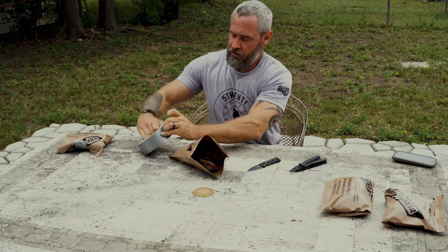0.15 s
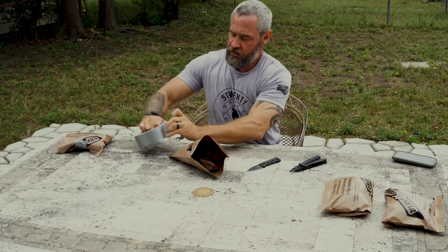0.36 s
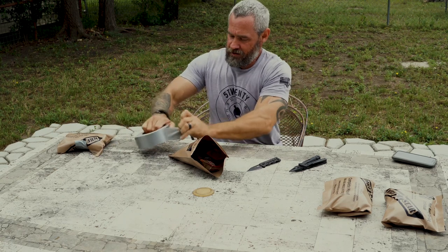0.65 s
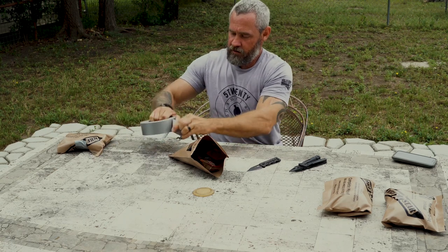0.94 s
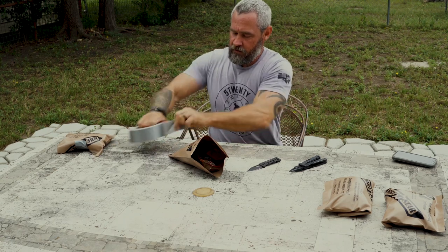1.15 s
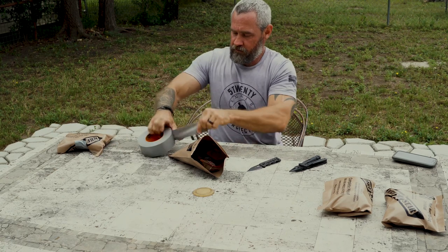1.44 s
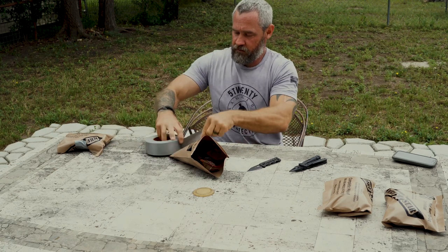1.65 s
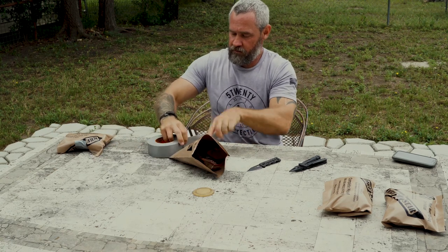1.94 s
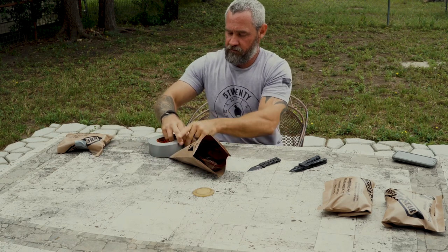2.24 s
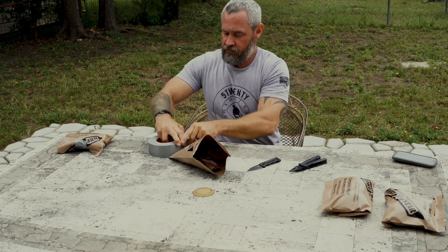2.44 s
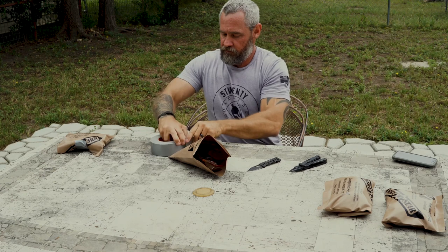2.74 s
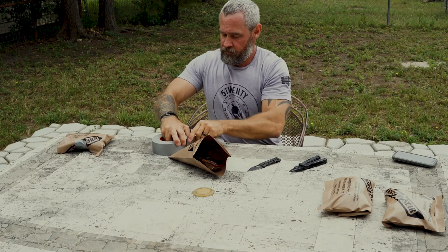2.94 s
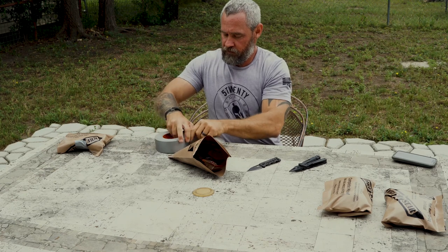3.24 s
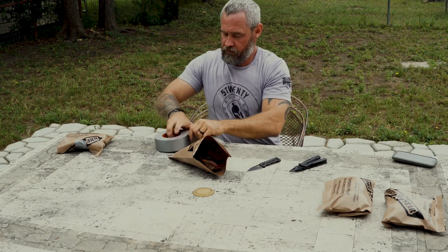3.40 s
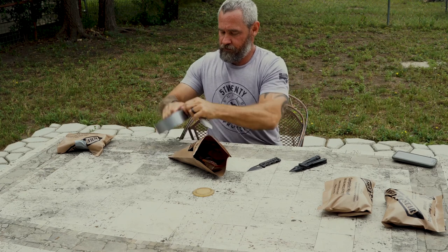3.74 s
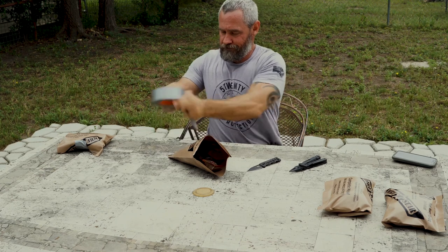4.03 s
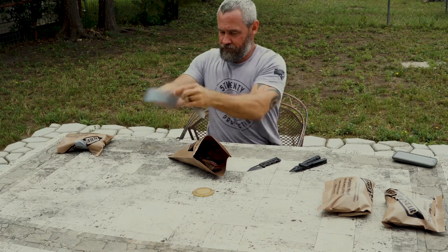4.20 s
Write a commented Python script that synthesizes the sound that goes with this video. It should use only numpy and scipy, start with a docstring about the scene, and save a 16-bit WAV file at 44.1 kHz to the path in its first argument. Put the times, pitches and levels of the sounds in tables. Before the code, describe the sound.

In a quiet garden, brief crackling tape pulls and hollow roll thumps come in clusters, with soft finger rubbing, distant birds and insects.

```python
"""A bird's quick falling phrase opens, then more birds and insects far off; cloth tape is pulled in short jerks.
Tape: glue lets go in stick-slip bursts of snaps that ring the strip's resonances. Roll: hollow knocks, decaying
modes struck on a stone garden table. Fingers: dense grains press and rub. Birds: gliding, warbled sines and a
hazy noise band. Insects: throbbing hiss and gated chirps. Beneath: coloured-noise air, pressure lumps, a fading
low tone; diffuse garden echoes."""
import sys
import numpy as np
from scipy import signal
from scipy.io import wavfile
from scipy.ndimage import uniform_filter1d

SR = 44100
rng = np.random.default_rng(int(sys.argv[2]) if len(sys.argv) > 2 else 0)


def volts_from_decibels(level):
    """Turn decibel levels (scalar or array-like) into linear amplitude factors."""
    exponent = np.asarray(level, float) / 20
    return 10 ** exponent


def log_audio(samples):
    """Write samples as a 16-bit WAV file to the path given in sys.argv[1]."""
    # one column per channel
    frames = np.atleast_2d(samples).T
    # limit to full scale, then quantise
    limited = np.clip(frames, -1, 1)
    pcm = np.round(limited * 32767).astype(np.int16)
    wavfile.write(sys.argv[1], SR, pcm)


N = 192349

# Levels are relative: layer gains, filters and drifts act on them.
# air noise spectrum: f/Hz, density/dB
AIR_SPECTRUM = [(15, -30), (25, 9.5), (86, -4), (367, -8), (615, -19.5), (1600, -19), (2300, -38),
                (2750, -19.5), (5250, -42.5), (6290, -41), (7350, -17.5), (8360, -34), (12000, -44.5),
                (15600, -72.5), (22000, -120)]
# left-right likeness of the air: f/Hz, likeness/0-1
AIR_LIKENESS = [(30, 0.081), (70, 0.52), (300, .9), (2000, 0.99), (8000, 0.24)]
# weak pressure lumps on the microphone: t/s, level/dB
WEAK_LUMPS = [(.029, -65), (1.33, -56)]
# faint low tone that fades out: f/Hz, level/dB, end/s
FAINT_TONE = (486, -77.5, 0.83)
# insect chorus level: t/s, level/dB
INSECT_LEVEL = [(0, -74), (.12, -86), (.35, -83.5), (.75, -74.5), (.89, -80), (1.1, -82), (1.6, -72),
                (1.81, -73.5), (2.54, -83.5), (2.93, -79.5), (3.36, -84.5), (3.61, -79), (4.37, -85.5)]
# plain bird whistles: t/s, length/s, first f/Hz, last f/Hz, level/dB
BIRD_WHISTLES = [(0.526, 0.093, 6260, 5500, -71), (1.182, 0.1, 7400, 5550, -74.5),
                 (1.224, 0.13, 2370, 2333, -64.5), (1.277, 0.028, 2250, 1730, -64),
                 (1.327, 0.012, 6234, 2658, -52.5), (1.411, .073, 1834, 1796, -67),
                 (1.723, 0.0073, 6860, 6220, -52.5), (1.877, 0.026, 6200, 5600, -68.5),
                 (1.937, 0.04, 4080, 4440, -73.5), (1.99, 0.046, 4180, 4430, -71.5),
                 (2.497, 0.039, 3424, 4540, -71.5), (3.024, 0.016, 5740, 5870, -70),
                 (3.038, 0.045, 6100, 5300, -66.5), (3.246, 0.11, 6950, 5630, -82),
                 (3.801, 0.043, 3460, 3290, -79), (3.833, 0.4, 2072, 2026, -79),
                 (4.03, 0.16, 5680, 4900, -71), (4.152, 0.09, 6600, 4950, -78.5),
                 (4.291, 0.045, 5870, 4900, -68.5), (4.047, .18, 2966, 2840, -79.5)]
# warbled notes on a held pitch: t/s, length/s, f/Hz, level/dB, warble depth/Hz
BIRD_WARBLES = [(0.164, 0.033, 3730, -60.5, 142), (0.208, 0.028, 3300, -65, 250),
                (0.23, 0.022, 3420, -86.5, 90), (0.897, 0.058, 1816, -68, 100.3),
                (0.934, 0.15, 2304, -69.5, 126), (1.123, 0.21, 2586, -76.5, 102),
                (2.46, 0.08, 4650, -81, 119.4), (2.507, 0.083, 3830, -73.5, 300),
                (2.553, 0.045, 3930, -66.5, 101), (2.756, 0.084, 2100, -66, 99),
                (3.203, 0.22, 2656, -71.5, 151.6), (3.755, 0.27, 2830, -82.5, 77.9),
                (3.943, 0.079, 3410, -71.5, 150.3), (3.983, 0.053, 3100, -70, 149)]
# phrases of a nearer bird, one list each: t/s, f/Hz, level/dB
BIRD_PHRASES = [
    [(.157, 2200, -70), (.16, 2550, -60), (.1645, 1900, -71), (.169, 2450, -54), (.174, 1900, -66),
     (.182, 2750, -48), (.189, 2100, -86), (.198, 3050, -48.5), (.204, 2000, -54), (.209, 2750, -63),
     (.214, 2000, -65)],
    [(.982, 1940, -70), (1.0, 1950, -64), (1.022, 1960, -63.5), (1.045, 1640, -68)],
    [(1.075, 1580, -72), (1.095, 1760, -64), (1.135, 1870, -64.5), (1.185, 1740, -68.5)],
    [(2.31, 6850, -73), (2.345, 6480, -79), (2.398, 6420, -82), (2.42, 6000, -77.5)],
    [(0, 5830, -47.5), (.012, 4630, -60.5), (.025, 3370, -60.5)],
    [(.079, 5220, -63), (.092, 4170, -55), (.102, 4000, -57), (.125, 3840, -68)],
    [(1.344, 4780, -58), (1.354, 3450, -55), (1.364, 3810, -55), (1.368, 3534, -63), (1.374, 3810, -51),
     (1.379, 2838, -61)],
    [(1.386, 2750, -61.5), (1.392, 3810, -54), (1.398, 2850, -61), (1.405, 3582, -57.5), (1.41, 3040, -56),
     (1.42, 3650, -53.5), (1.424, 3667, -54), (1.434, 3752, -52.5), (1.445, 3357, -49.5), (1.45, 2700, -66)],
    [(1.652, 8540, -67), (1.664, 8100, -54), (1.68, 7000, -53), (1.705, 4400, -62), (1.722, 3400, -52),
     (1.733, 3040, -58)],
]
# repeated call that drops fast onto a held pitch: t/s, held f/Hz, level/dB
BIRD_CHEEPS = [(2.101, 5270, -66.5), (2.191, 5370, -67), (2.292, 5290, -70.5), (2.396, 5240, -71.5),
               (2.5, 5180, -73.5)]
# far overlapping song: start/s, end/s, low f/Hz, high f/Hz, level/dB
FAR_BIRDS = (1.2, 2, 1605, 2603, -69.5)
# skin-on-cloth spectrum: f/Hz, density/dB
RUB_SPECTRUM = [(120, -30), (200, -2), (330, -3.5), (560, -16.5), (850, -9.5), (1300, -4.5), (1900, -12.5),
                (2700, -6), (3600, -6), (5300, -14), (6400, -29.5), (8000, -31.5), (14000, -36.5)]
# finger strokes on tape and pouch: peak t/s, rise/s, fall/s, peak level/dB, treble/dB
FINGER_STROKES = [(0.079, 0.053, 0.094, -67.5, 18), (1.25, 0.047, 0.061, -80, 23),
                  (1.351, 0.027, .07, -60.5, 8), (1.496, 0.048, .005, -58.5, 16),
                  (2.28, 0.1, 0.13, -70, 14.5), (2.65, 0.081, 0.13, -56.5, 10),
                  (2.852, 0.046, 0.096, -56, 16), (2.961, 0.074, 0.1, -52, -16.5),
                  (3.171, 0.059, 0.091, -55, -13.5), (3.3, 0.024, 0.063, -72.5, 21),
                  (3.371, 0.043, 0.04, -62.5, -10), (3.598, 0.12, 0.048, -55.5, 0),
                  (3.7, 0.077, 0.28, -76.5, 20.5), (3.86, 0.036, 0.16, -78.5, 21.5)]
# modes of the hollow roll on the slab: nominal f/Hz, level/dB, undamped t60/s
ROLL_MODES = [(110, -22.5, 0.14), (187.5, -7, 0.25), (222, 0, 0.19), (281.9, -1.5, 0.3), (335, 1.5, 0.14),
              (381, -1.5, 0.18), (465, -5.5, 0.24), (506, -6, 0.3), (672, -11.5, 0.069), (830, -6, 0.15),
              (900, -3, 0.025), (970, -3.5, 0.25), (1170, 8.5, 0.039), (1340, 11, 0.017),
              (1723, -6.5, 0.28), (2180, -7, 0.044), (3100, -5, 0.084)]
# blows and tugs on the roll: t/s, level/dB, hardness/Hz, freedom from the hand's damping/0-1
ROLL_KNOCKS = [(.743, -44.5, 704, 1), (0.775, -27.5, 700, 0.3), (0.793, -31.5, 690, 0.4),
               (1.4979, -27, 503, 0.86), (1.519, -28.5, 610, 0.9), (1.548, -37.5, 700, 0.87),
               (1.58, -27, 615, 0.2), (1.761, -33, 883, 0.27), (1.766, -44, 883, 0.3),
               (1.773, -51, 883, 0.4), (1.8052, -16.5, 400, 0.66), (1.844, -20.5, 323, 0.55),
               (1.867, -32, 300, 0.58), (1.9, -35.5, 300, 0.77), (2.064, -38.5, 855, 0.92),
               (2.091, -19.5, 2900, 0.58), (2.131, -25, 600, 0.49), (2.66, -53.5, 495, 0.53),
               (2.8692, -36, 2970, 0.39), (2.888, -43, 1979, 0.75), (2.979, -46.5, 447, 1),
               (3.008, -50.5, 397, 0.72), (3.612, -48.5, 503, 0.76)]
# resonances of free strip and table reflection: f/Hz, width/Hz, level/dB
STRIP_MODES = [(318, 41, -24), (838, 150, -14.5), (1100, 320, -4.5), (1487, 280, 0), (2100, 510, -2.5),
               (2700, 430, 0.5), (4000, 590, -4.5), (4900, 1100, -5), (8570, 1200, -12),
               (9550, 2000, -13.5), (12750, 1100, -19.5), (14500, 700, -17.5)]
# stick-slip bursts of the glue: t/s, length/s, level/dB, tautness/dB, crispness/dB
GLUE_SLIPS = [(.063, .002, -64, 0, 9), (.0738, .003, -43, -1, 9), (.6087, .002, -33.5, -.5, -.5),
              (.6245, .007, -31, 3, 5), (.641, .006, -28, 3, 2), (.647, .005, -21, 0, -4),
              (.6585, .0017, -28, -1, -8), (.7425, .007, -21.5, -6, 5), (.7535, .016, -23.5, -5, 6),
              (.774, .008, -22, -3, 5.5), (.791, .007, -19.5, -5, 6), (1.351, .003, -41.5, -3, -1),
              (1.4625, .004, -43, 3, 6.5), (1.4985, .0028, -26, -2, 6), (1.503, .004, -26, -2, 6),
              (1.5085, .0355, -26.5, -1, 7), (1.544, .02, -23.5, -.5, 8), (1.564, .0048, -20, 1.5, 3),
              (1.572, .0045, -21.5, 3, -2), (1.5795, .0028, -22, 0, -.5), (2.028, .003, -55, 3, 0),
              (2.0315, .002, -43, 3, 4.5), (2.034, .01, -50, 3, 2), (2.0445, .0025, -35, 4, 5),
              (2.063, .011, -43, -2, 0), (2.08, .003, -52, 5, -4), (2.25, .003, -55, 10, 8.5),
              (2.485, .003, -75, 5, 22), (2.596, .002, -63, 2, 0), (2.632, .022, -53, 6, -8),
              (2.6555, .002, -44, 10, -10), (2.659, .018, -54, 6, -8), (2.6775, .0015, -39, 7, -11),
              (2.8684, .0042, -15, -1, -2), (2.952, .009, -43.5, -2, -8.5), (3.273, .003, -54, -2, -6),
              (3.352, .002, -48, 7, -14), (3.366, .014, -57.5, 3, -15.5), (3.49, .004, -58, 6, -12),
              (3.503, .006, -55, 2, -3), (3.516, .014, -42, 1, 0), (3.53, .015, -45.5, 3.5, -3),
              (3.546, .009, -52, 0, 6), (3.567, .007, -42, 5.5, 2), (3.579, .008, -52, -3, 3),
              (3.598, .007, -57, 0, 3), (3.613, .003, -57, 3, 0), (4.342, .006, -66, 3, 8),
              (4.351, .003, -48, 4, 20), (4.354, .004, -45, 1, 24), (4.3578, .004, -36.5, 0, 25)]
# three slips with the same snaps: first t/s, spacing/s, length/s, level/dB, tautness/dB, crispness/dB
WEAVE_STUTTER = (1.7627, .005, .0022, -23, 3, -6)


def rms_one(x):
    """Scale to rms 1."""
    return x / np.sqrt(np.mean(x ** 2) + 1e-20)


def at_hz(points, hz):
    """Read a spectrum on a log-frequency axis."""
    points_hz, values = np.transpose(points)
    return np.interp(np.log(hz), np.log(points_hz), values)


def level(rows):
    """Gain from timed rows of dB."""
    s, db = np.transpose(rows)
    return volts_from_decibels(np.interp(np.arange(N) / SR, s, db))


def band(x, low_hz, high_hz):
    """Second-order band-pass."""
    sos = signal.butter(2, [low_hz, min(high_hz, SR / 2.1)], "band", fs=SR, output="sos")
    return signal.sosfilt(sos, x)


def drift(rate_hz):
    """Slow random wander of rms 1: low-passed noise."""
    r = np.exp(-2 * np.pi * rate_hz / SR)
    noise = rng.standard_normal(N + SR)
    return rms_one(signal.lfilter([1], [1, -2 * r, r * r], noise)[SR:])


def sine(hz):
    """Sine that follows an instantaneous frequency."""
    return np.sin(2 * np.pi * np.cumsum(hz) / SR)


def ring(x, hz, t60_s):
    """Two-pole ringing: a unit click starts a decaying sine of height 1."""
    r, w = volts_from_decibels(-60 / (t60_s * SR)), 2 * np.pi * hz / SR
    return signal.lfilter([0, np.sin(w)], [1, -2 * r * np.cos(w), r * r], x + 1e-18)


def resonance(x, hz, width_hz):
    """Two-pole resonance, gain 1 on top; it speaks at once."""
    r = np.exp(-np.pi * width_hz / SR)
    numerator = (1 - r * r) / 2 * np.array([1, 0, -1])
    return signal.lfilter(numerator, [1, -2 * r * np.cos(2 * np.pi * hz / SR), r * r], x)


def snaps(per_s, spread_db):
    """Random clicks of very uneven size; rms 1."""
    sizes = volts_from_decibels(spread_db * np.minimum(rng.exponential(1, N), 4)) * rng.choice([-1, 1], N)
    return rms_one(sizes * (rng.random(N) < per_s / SR))


def coloured(white, spectrum, patchy_db, likeness=None):
    """Half-octave bank; each band has its own level, flicker and, for stereo, likeness."""
    out, edges_hz = 0, 22 * 2 ** np.arange(0, 9.6, .5)
    for k, (low_hz, high_hz) in enumerate(zip(edges_hz, edges_hz[1:])):
        hz = np.sqrt(low_hz * high_hz)
        part = band(white[k % 2], low_hz, high_hz)  # neighbours use separate sources
        if likeness:
            alike = np.clip(at_hz(likeness, hz), 0, 1)
            middle, side = np.sqrt(1 + alike) * part[0], np.sqrt(1 - alike) * part[1]
            part = middle + side * [[1], [-1]]
        out = out + volts_from_decibels(at_hz(spectrum, hz) + patchy_db * drift(1.8)) * part
    return rms_one(out)


def garden(x, delay_s, t60_s, db, wide):
    """Scattered dull echoes: a dying noise tail that swells in, partly different in each ear."""
    t = np.arange(int(.6 * SR)) / SR
    shape = volts_from_decibels(-60 * t / t60_s) * (1 - np.exp(-(t / delay_s) ** 2))
    tail = band(rng.standard_normal((2, len(t))), 220, 8800) * shape
    tail = tail[0] + wide * tail[1] * [[1], [-1]]
    tail /= np.sqrt(np.sum(tail[0] ** 2))
    return volts_from_decibels(db) * signal.fftconvolve(x[None], tail, axes=1)[:, :N]


def air():
    """Open-air noise, coloured per band, patchy in level and partly alike left and right."""
    white = rng.standard_normal((2, 2, N))
    return volts_from_decibels(-67.5) * coloured(white, AIR_SPECTRUM, patchy_db=2.0, likeness=AIR_LIKENESS)


def lumps():
    """Slow pushes of air, felt more than heard: a quick pull, then a slower push."""
    first_s, every_s, beat_db, left_over_right_db = .564, 1.117, -43, 3
    beat = [(first_s + k * every_s, beat_db) for k in range(4)]
    out, u = np.zeros(N), np.linspace(0, 1, round(.2 * SR))
    for s, db in WEAK_LUMPS + beat:
        a = round(s * SR)
        out[a:a + len(u)] += volts_from_decibels(db) * np.sin(np.pi * u) * np.sin(-2 * np.pi * np.sqrt(u))
    return out * volts_from_decibels(left_over_right_db * np.c_[[.5, -.5]])


def low_tone():
    """A sine of fixed pitch, unsteady in level, that dies away."""
    (hz, db, end_s), t = FAINT_TONE, np.arange(N) / SR
    fade = np.clip(1 - t / end_s, 0, 1) ** 0.59
    return volts_from_decibels(db + 4.2 * drift(39)) * fade * np.sin(2 * np.pi * hz * t)


def insects():
    """A far chorus: a fluttering band of hiss, and one nearer singer that chirps in bouts."""
    chirp_hz, chirps_per_s = 7800, 22
    hiss = band(band(rng.standard_normal((2, N)), 6900, 7600), 6750, 9700)
    hiss = rms_one(hiss[0] + 0.51 * hiss[1] * [[1], [-1]]) * volts_from_decibels(2.0 * drift(25))
    phase = 2 * np.pi * chirps_per_s * np.arange(N) / SR + drift(3)
    gate = np.maximum(np.sin(phase), 0) ** 3
    chirps = rms_one(band(rng.standard_normal(N), chirp_hz - 90, chirp_hz + 90)) * gate
    return level(INSECT_LEVEL) * (hiss + chirps * volts_from_decibels(-3 + 5 * drift(2.5)))


def bird_notes(waver):
    """Whistles glide to their last pitch; warbles hold theirs under a fast sinusoidal swing."""
    out, warble_hz = np.zeros(N), 66
    notes = [row + (0,) for row in BIRD_WHISTLES]
    notes += [(s, length_s, hz, hz, db, deep_hz) for s, length_s, hz, db, deep_hz in BIRD_WARBLES]
    turns = rng.random(len(notes))
    for (s, length_s, first_hz, last_hz, db, deep_hz), turn in zip(notes, turns):
        a = max(round(s * SR), 0)
        u = np.linspace(0, 1, round(length_s * SR))[:N - a]
        glide_hz = last_hz + (first_hz - last_hz) * (1 - u) ** 1.2
        swing_hz = deep_hz * np.sin(2 * np.pi * (warble_hz * length_s * u + turn))
        hz = glide_hz * waver[a:a + len(u)] + swing_hz
        out[a:a + len(u)] += volts_from_decibels(db) * np.sin(np.pi * u) ** 0.18 * sine(hz)
    return out


def bird_phrases():
    """A nearer bird: sines led through points of pitch and level."""
    out = np.zeros(N)
    for phrase in BIRD_PHRASES:
        s, hz, db = np.transpose(phrase)
        at = np.arange(round(s[0] * SR), round(s[-1] * SR))
        edges = np.sin(np.linspace(0, np.pi, len(at))) ** .2
        gain = np.sqrt(2) * edges * volts_from_decibels(np.interp(at / SR, s, db))
        out[at] += gain * sine(np.interp(at / SR, s, hz))
    return out


def bird_cheeps(waver):
    """A repeated call: pitch falls exponentially onto a held note."""
    length_s, drop_hz, drop_time_constant_s = 0.099, 645, .014
    out, t = np.zeros(N), np.arange(round(length_s * SR)) / SR
    for s, held_hz, db in BIRD_CHEEPS:
        a = round(s * SR)
        hz = held_hz * waver[a:][:len(t)] + drop_hz * np.exp(-t / drop_time_constant_s)
        out[a:][:len(t)] += volts_from_decibels(db) * np.sin(np.pi * t / length_s) ** 0.16 * sine(hz)
    return out


def far_song():
    """Far overlapping song: band-passed noise, swelling and fading once."""
    start_s, end_s, low_hz, high_hz, db = FAR_BIRDS
    u = np.clip((np.arange(N) / SR - start_s) / (end_s - start_s), 0, 1)
    bout = np.sqrt(np.sin(np.pi * u) + 1e-9)
    haze = rms_one(band(band(rng.standard_normal((2, N)), low_hz, high_hz), low_hz, high_hz))
    return volts_from_decibels(db + 2.0 * drift(7.8)) * bout * (haze[0] + 0.6 * haze[1] * [[1], [-1]])


def birds():
    """Sines that glide, warble and waver, blurred by the trees, plus the far song."""
    waver = 1 + .006 * drift(30)
    song = bird_notes(waver) + bird_phrases() + bird_cheeps(waver)
    song *= volts_from_decibels(2.5 * drift(40))
    pan = volts_from_decibels(np.c_[[1.5, -1.5]] * drift(2.5))
    return song * pan + far_song() + garden(song, delay_s=.004, t60_s=.32, db=-9.5, wide=.8)


def fingers():
    """Dense small grains of skin and cloth; the stiff pouch adds treble."""
    range_db = 20  # gained over a stroke's rise, lost over its fall
    grains = np.array([snaps(2200, spread_db=3.5), snaps(2000, spread_db=4.0)])
    rub = coloured(grains, RUB_SPECTRUM, patchy_db=3.0)
    treble = band(band(grains[0], 7000, 16000), 6000, 17000) * volts_from_decibels(-22)
    t, out = np.arange(N) / SR, 0
    for s, rise_s, fall_s, db, treble_db in FINGER_STROKES:
        away = np.where(t < s, (s - t) / rise_s, (t - s) / fall_s)
        out = out + volts_from_decibels(db - range_db * away) * (rub + treble * volts_from_decibels(treble_db))
    return out


def roll():
    """A blow is a click, then a short chatter on the rough stone; it strikes each mode with its own strength."""
    out = np.zeros(N)
    luck_db = rng.normal(0, 1.5, (len(ROLL_KNOCKS), len(ROLL_MODES)))
    t = np.arange(SR // 2) / SR
    grips = 1 + rng.normal(0, .012, luck_db.shape)  # the grip bends every mode a little
    for (s, knock_db, hard_hz, free), own_db, grip in zip(ROLL_KNOCKS, luck_db, grips):
        a = round(s * SR)
        crack = band(rng.standard_normal(len(t)) * np.exp(-t / 0.0076), 860, 2900) * hard_hz / 1000
        out[a:a + len(t)] += volts_from_decibels(knock_db - 11.5) * free * crack[:N - a]
        for k, ((hz, mode_db, t60_s), extra_db) in enumerate(zip(ROLL_MODES, own_db)):
            touch = volts_from_decibels(-26.5) * free * rng.standard_normal(len(t)) * np.exp(-t / 0.016)
            touch[0] = -1 if 200 < hz < 400 else (-1) ** k  # click polarity per mode
            # a softer blow excites the high modes less
            gain = volts_from_decibels(knock_db - 7.5 + mode_db + extra_db) / (1 + (hz / hard_hz) ** 2)
            out[a:a + len(t)] += gain * ring(touch, hz * grip[k], t60_s * free)[:N - a]
    # a small object radiates no deep bass
    return band(band(out, 180, 8000), 100, 9000)


def slip_curves(slips):
    """Level, tautness and crispness over time, in dB; the louder of overlapping slips rules."""
    rise_db, release_db_per_s = 1, 8000
    db, taut_db, crisp_db = np.full(N, -200.), np.zeros(N), np.zeros(N)
    for start_s, length_s, slip_db, slip_taut_db, slip_crisp_db in slips:
        a = round(start_s * SR)
        t = np.arange(min(SR // 10, N - a)) / SR
        ramp_db = slip_db + rise_db * (np.minimum(t / length_s, 1) - .5)
        ramp_db -= release_db_per_s * np.maximum(t - length_s, 0)
        louder = np.flatnonzero(ramp_db > db[a:a + len(t)]) + a
        db[louder] = ramp_db[louder - a]
        taut_db[louder], crisp_db[louder] = slip_taut_db, slip_crisp_db
    return db, taut_db, crisp_db


def tape():
    """Glue threads snap densely in each slip and ring the strip; tautness and crispness tilt its treble."""
    first_s, spacing_s, *alike = WEAVE_STUTTER
    slips = GLUE_SLIPS + [(first_s + k * spacing_s, *alike) for k in range(3)]
    db, taut_db, crisp_db = slip_curves(slips)
    threads = snaps(8000, spread_db=2.5)
    # even out the snaps' short-term energy, so each slip keeps near its set level
    threads /= np.sqrt(uniform_filter1d(threads ** 2, size=SR // 150) + .2)
    a, step = round(first_s * SR), round(spacing_s * SR)
    threads[a:a + 3 * step] = np.tile(threads[a:a + step], 3)
    threads[[round(row[0] * SR) for row in slips]] = 6  # the glue breaks loose with one hard snap
    threads *= volts_from_decibels(db + 1.5 * drift(300))
    out = np.zeros(N)
    for k, (hz, width_hz, mode_db) in enumerate(STRIP_MODES):
        taut_tilt_db = taut_db * np.clip(np.log2(hz / 1900), -1, 1)
        crisp_tilt_db = crisp_db * np.clip(np.log2(hz / 3000), 0, 1.2)
        flex_db = 2.0 * drift(60)  # the strip flexes, its resonances come and go
        drive = threads * volts_from_decibels(taut_tilt_db + crisp_tilt_db + flex_db + mode_db + 8)
        out += resonance(drive + 1e-18, hz, width_hz) * (-1) ** k * np.sqrt(600 / width_hz)
    return out


def scene():
    """Near sounds in the middle, their echoes and the garden around."""
    near = tape() + roll()
    echoes = garden(near, delay_s=.025, t60_s=0.21, db=-26.5, wide=.12)
    return air() + lumps() + low_tone() + insects() + birds() + fingers() + echoes + near


def roll_off(x):
    """The treble ends steeply here."""
    return signal.sosfilt(signal.butter(12, 16630, fs=SR, output="sos"), x)


def record(dry):
    """A steep low-pass cuts the top, 50 dB down from 16.9 kHz."""
    cut = signal.sosfilt(signal.cheby2(10, 50, 16900, fs=SR, output="sos"), dry)
    return roll_off(cut)


dry = scene()
out = record(dry)
log_audio(out)
```